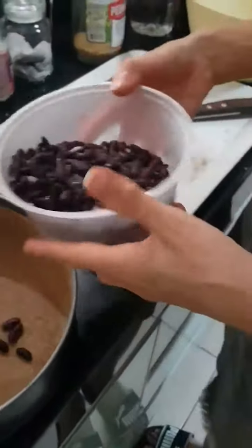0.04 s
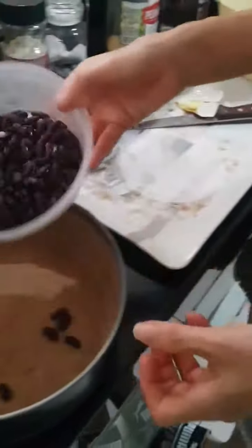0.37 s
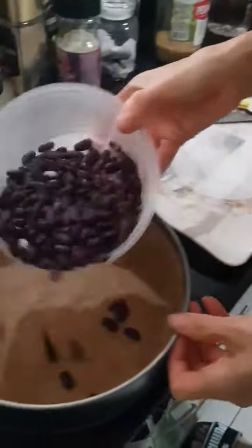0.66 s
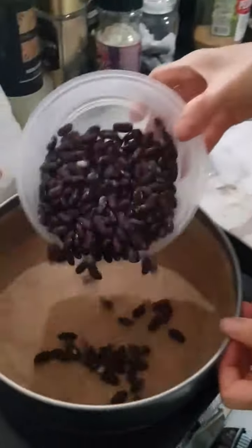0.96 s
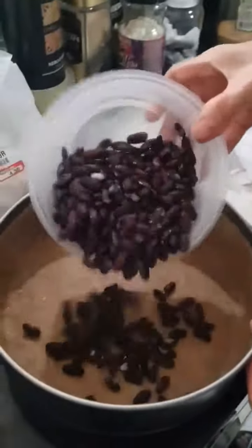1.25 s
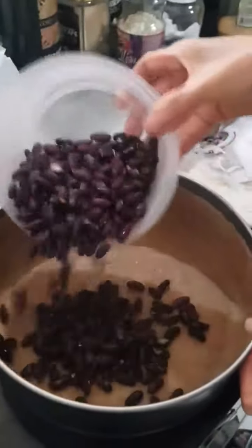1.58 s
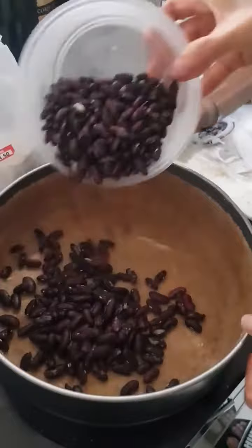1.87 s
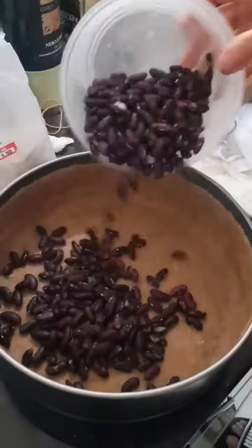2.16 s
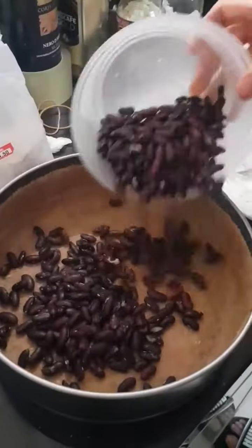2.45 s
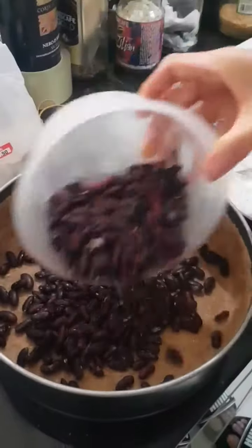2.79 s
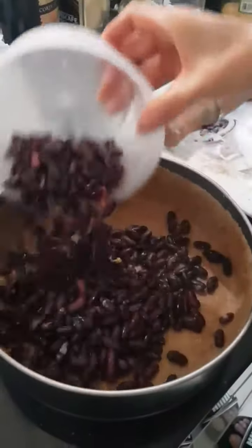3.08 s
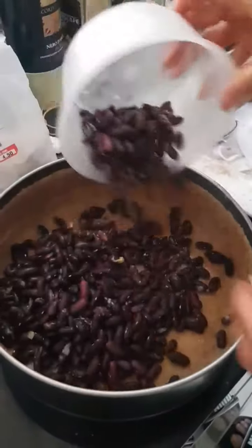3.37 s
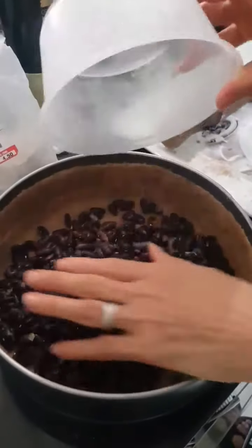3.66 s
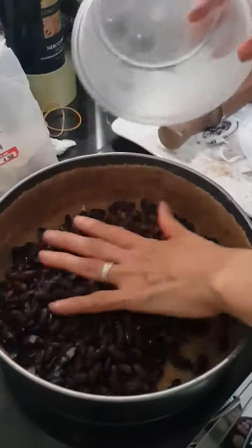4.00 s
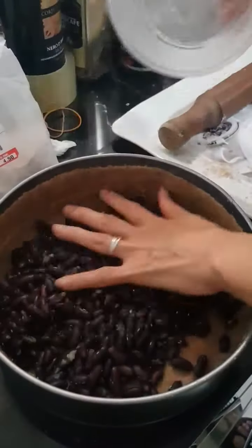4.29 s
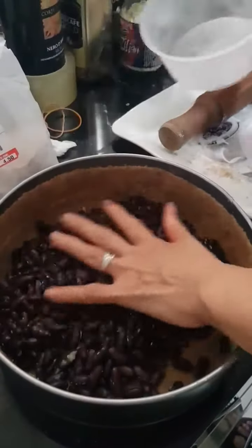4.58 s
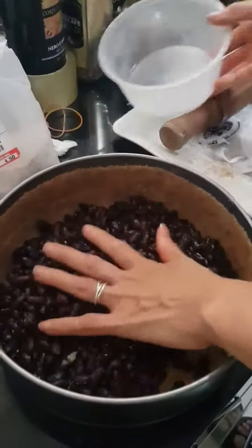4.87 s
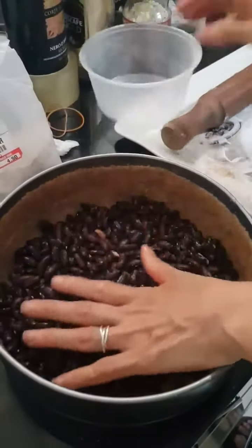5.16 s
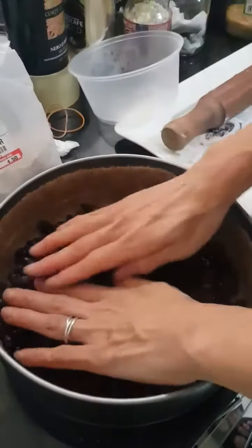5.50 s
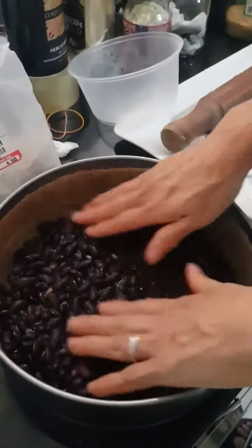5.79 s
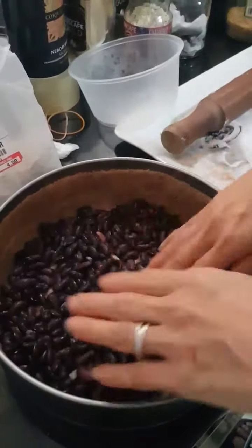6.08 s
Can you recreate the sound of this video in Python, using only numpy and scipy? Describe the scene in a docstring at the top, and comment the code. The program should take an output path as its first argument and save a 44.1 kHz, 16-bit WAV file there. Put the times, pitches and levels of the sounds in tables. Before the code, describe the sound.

From the start, dried beans slide and rattle along the wall of a thin plastic tub in short shakes. From about 0.7 seconds they land in a paper-lined metal baking tin with dull, hollow taps. The pour comes in quick uneven surges, growing denser from 1.2 seconds, with bright clicks of bean on bean. A last, strong rush comes around 3.6 seconds and dies away at once.

From about 4 to 5.2 seconds a hand spreads the heap in several quieter strokes, a soft grinding with small clicks. Between 5 and 5.4 seconds the empty tub is put down with a few briefly ringing knocks, the loudest near 5.15 seconds. Faint stirs of the beans follow until about 6.1 seconds. Everything sounds close, with the short echo of a small kitchen, over a low, steady appliance hum.

```python
"""Dried beans into a baking tin

In a small kitchen, beans are shaken from a plastic tub into a paper-lined metal tin. Each shake lets
go a little avalanche that rattles along the tub, clicks bean on bean and drums on the damped base.
Hands spread the heap, then the tub is put down beside the tin with a few ringing knocks.
An appliance hums throughout."""
import sys
import numpy as np
from scipy import signal
from scipy.io import wavfile
from scipy.ndimage import uniform_filter1d

SR = 44100
rng = np.random.default_rng(int(sys.argv[2]) if len(sys.argv) > 2 else 0)


def waveform_to_disk(signal):
    """Save audio, clipped to [-1, 1], as 16-bit WAV at the path in sys.argv[1]."""
    frames = np.transpose(np.atleast_2d(signal))
    scaled = np.clip(frames, -1, 1) * 32767
    samples = np.round(scaled).astype(np.int16)
    wavfile.write(sys.argv[1], SR, samples)


N = 275228
TIME = np.arange(N) / SR


def from_db(db):
    """Decibels to gain."""
    return 10 ** (np.asarray(db) / 20)


def rms(x):
    """Root mean square."""
    return np.sqrt(np.mean(x ** 2) + 1e-20)


def unit_energy(blow):
    """Scale a short sound to an average energy of 1 per ear."""
    return blow / (rms(blow) * np.sqrt(blow.shape[1]))


def at_hz(points, hz):
    """Read a curve on a log-frequency axis."""
    freqs, values = np.transpose(points)
    return np.interp(np.log(hz), np.log(freqs), values)


def add(out, s, sound):
    """Mix a short stereo sound in at s seconds."""
    start = round(s * SR)
    out[:, start:start + sound.shape[1]] += sound[:, :N - start]


def coloured(spectrum, envelope):
    """Stereo noise under an envelope, rung through third-octave bands, each with its own width and pan."""
    # how alike the ears are, held within +-0.97 below: (frequency [Hz], likeness [ratio])
    likeness = [(240, 2.8), (300, 0.4), (750, 0.9), (1200, 0.1), (2200, 0.61), (5000, 0), (15000, 0)]
    # pan across the spectrum: (frequency [Hz], left minus right [dB])
    balance = [(150, 0), (500, 1), (1200, 2), (2100, -4), (3300, -3.5), (5000, 2), (14000, 1.5)]
    white = rng.standard_normal((2, 2, len(envelope))) * envelope + 1e-18
    edges = 20 * 2 ** (np.arange(31) / 3)
    out, ears = 0, np.array([[1], [-1]])
    for k, (low, high) in enumerate(zip(edges, edges[1:])):
        hz = np.sqrt(low * high)
        if hz < spectrum[0][0] / 2:
            continue
        band = signal.butter(2, [low, high], "band", fs=SR, output="sos")
        mid, side = signal.sosfilt(band, white[k % 2])
        alike = np.clip(at_hz(likeness, hz), -.97, .97)
        gain = from_db(at_hz(spectrum, hz) + ears * at_hz(balance, hz) / 2)
        out = out + gain * (np.sqrt(1 + alike) * mid + np.sqrt(1 - alike) * side * ears)
    return out


def contacts(spectrum, t60, rise_s, count=32, size=2048):
    """Blows on different spots of one body: noise bursts stand for its dense, fast-dying modes."""
    envelope = (1 - np.exp(-TIME[:size] / rise_s)) * from_db(-60 * TIME[:size] / t60)
    bursts = coloured(spectrum, np.tile(envelope, count))
    return [unit_energy(blow) for blow in np.split(bursts, count, axis=1)]


def pitched(blow, hz, q, boost_db):
    """The struck spot favours one short resonance."""
    peak = signal.lfilter(*signal.iirpeak(hz, q, fs=SR), blow)
    return unit_energy(blow + from_db(boost_db) * peak)


def ring(modes, size, treble_hz=1100):
    """Struck modes, a little to the left; the higher a mode, the more its phase differs between ears."""
    t = TIME[:size]
    hz, mode_db, t60 = np.transpose(modes)[:, :, None]
    phase = rng.uniform(0, 2 * np.pi, hz.shape) + rng.standard_normal((2, *hz.shape)) * hz / treble_hz / 2
    sines = from_db(mode_db - 60 * t / t60) * np.sin(2 * np.pi * hz * t + phase)
    attack = 1 - np.exp(-t / 0.00037)
    return sines.sum(1) * attack * from_db([[1.5], [-1.5]])


def rattle(blows, level_db, per_s, spread_db, clump_db, clump_hz):
    """Random collisions of uneven size, swelling in clumps; the loudest flow has per_s a second."""
    knots = rng.standard_normal(4000)
    clumps = np.interp(TIME * clump_hz, np.arange(len(knots)), knots)
    rate = per_s * from_db((level_db - level_db.max()) / 2)
    strength = from_db(spread_db * np.clip(rng.standard_normal(N), -2, 2)) * rng.choice([-1, 1], N)
    clicks = (rng.random(N) < rate / SR) * strength * from_db(clump_db * clumps)
    # the flow sets the energy that the collisions share in each twentieth of a second
    local_rms = np.sqrt(np.abs(uniform_filter1d(clicks ** 2, SR // 20)) + 1e-6)
    clicks = clicks / local_rms * from_db(level_db)
    out, spot = np.zeros((2, N)), rng.integers(0, len(blows), N)
    for i in np.flatnonzero(clicks):
        add(out, i / SR, clicks[i] * blows[spot[i]])
    return out


def hits(blows, rows, gain_db, q, boost_db, bounce_s, bounce_db):
    """Accents: a bean strikes hard with its own pitch, then tips over and touches again more softly."""
    out = np.zeros((2, N))
    for k, ((s, db, hz), wait) in enumerate(zip(rows, rng.uniform(.5, 1.5, len(rows)))):
        add(out, s, from_db(db + gain_db) * pitched(blows[k % len(blows)], hz, q, boost_db))
        add(out, s + wait * bounce_s, from_db(db + gain_db + bounce_db) * blows[(k + 1) % len(blows)])
    return out


def appliance():
    """The bed of the scene: low air noise and mains hum."""
    # colour of the air noise: (frequency [Hz], level [dB])
    air_colour = [(20, -13), (33, -10), (50, -2), (66, 1), (85, -11), (125, -4), (175, -3), (260, -8),
                  (420, -14.5), (1000, -17), (3000, -27.5), (8000, -33.5), (15000, -33)]
    # slow rise and fall of the whole drone: (time [s], level [dB])
    level_curve = [(0, -47), (1.3, -47), (1.7, -44), (3.2, -45), (5.05, -46.5), (5.3, -50.5), (6.24, -51.5)]
    # mains tones: (frequency [Hz], level against the air noise [dB])
    mains = [(100.1, -5.5), (200.2, -10.5)]
    air = coloured(air_colour, np.ones(N))
    hum = sum(from_db(db) * np.sqrt(2) * np.sin(2 * np.pi * (hz * TIME + rng.random())) for hz, db in mains)
    level_db = np.interp(TIME, *np.transpose(level_curve))
    return from_db(level_db) * (air / rms(air) + hum)


def pour(on_wall=False, on_base=False):
    """Envelope in dB of the pour, bean on bean by default: each avalanche swells, runs and settles."""
    # one avalanche per tip or shake of the tub:
    # (time [s], length [s], bean-on-bean level [dB], tub wall offset [dB], tin base offset [dB])
    avalanches = [(-0.02, 0.1, -51.5, 6, -8), (0.209, 0.027, -59, 12.5, -4.5),
                  (0.314, 0.11, -44.5, 7.5, -10.5), (0.49, 0.057, -47, 8, -1), (0.589, 0.034, -50, 9, -0.5),
                  (0.68, 0.13, -51, 9.5, 7), (0.847, 0.066, -46, 3, 6), (0.954, 0.033, -47.5, 3, 3.5),
                  (1.047, 0.13, -50, 8.5, 10), (1.18, .10, -42, 1.5, 4), (1.343, 0.15, -39.5, 1, -2),
                  (1.508, 0.12, -40.5, 4, -1.5), (1.658, .17, -45, 5.5, 3), (1.966, 0.089, -51, 7, 8.5),
                  (2.174, 0.11, -46.5, 6.5, 5), (2.33, 0.12, -47, 8, 6), (2.405, .11, -40.5, 2.5, 3.5),
                  (2.602, 0.088, -49, 4, 3), (2.742, .04, -45, -5, 1), (2.844, 0.11, -43.5, 6, 0),
                  (2.937, .15, -39.5, 4, -3), (3.098, 0.18, -42, -0.5, -1), (3.332, 0.046, -42.5, 2, 6.5),
                  (3.416, 0.1, -40.5, -1, -3.5), (3.57, 0.078, -34.5, -7.5, -2),
                  (3.71, 0.027, -59, -13, 9.5)]
    attack_s, settle_db_per_s = 0.029, 132.5
    power = 1e-12
    for s, length, db, wall_db, base_db in avalanches:
        swell = np.clip((TIME - s) / attack_s, 0, 1)
        settle_db = settle_db_per_s * np.clip(TIME - s - length, 0, 1)
        power = power + (swell * from_db(db + on_wall * wall_db + on_base * base_db - settle_db)) ** 2
    return 10 * np.log10(power)


def tub_rattle():
    """Beans tumble along the thin plastic wall, each with a short woody note."""
    # colour of one tap on the wall: (frequency [Hz], level [dB])
    wall_colour = [(300, -10), (600, -7.5), (1100, 0), (1500, -8.5), (2000, -4), (2450, 1.5), (3300, -6),
                   (4500, -6.5), (7000, -16), (15000, -27)]
    # the hardest slaps on the wall: (time [s], relative level [dB], pitch [Hz])
    slaps = [(0.382, -28, 2340), (0.3964, -20.5, 2400), (0.4183, -16, 2450), (0.611, -28, 3040),
             (0.7825, -28.5, 2680), (1.2238, -25.5, 2880), (1.5176, -20, 2020), (1.5394, -21.5, 2700),
             (1.6975, -20, 2340), (2.1301, -25.5, 2270), (2.4242, -24, 2740), (2.459, -19.5, 2500),
             (2.5213, -25, 2930), (2.607, -29.5, 2560), (2.6558, -23.5, 2020), (2.8474, -17, 3100),
             (2.9558, -26, 2440), (3.0769, -20, 2560), (3.3179, -19.5, 2060)]
    taps = contacts(wall_colour, t60=0.017, rise_s=0.00082, size=1024)
    pitches = np.geomspace(1000, 4000, len(taps))
    blows = [pitched(tap, hz, q=12.6, boost_db=12) for tap, hz in zip(taps, pitches)]
    stream = rattle(blows, pour(on_wall=True) + 2.66, per_s=900, spread_db=2.5, clump_db=1.5, clump_hz=87.2)
    return stream + hits(taps, slaps, gain_db=19.5, q=10, boost_db=8.5, bounce_s=.003, bounce_db=-8.5)


def bean_clicks():
    """Hard skins click together, in the stream and then under the hands; small beans click higher."""
    # colour of one bean striking another: (frequency [Hz], level [dB])
    skin_colour = [(500, -11), (1500, -9.5), (3000, -1), (5000, -1), (7000, -4), (9500, -1), (12000, 1),
                   (15500, -5.5)]
    # the sharpest clicks: (time [s], relative level [dB], pitch [Hz])
    ticks = [(0.8794, -37.5, 10200), (1.058, -29.5, 8400), (1.394, -32, 9100), (1.5544, -21.5, 13500),
             (1.9322, -36.5, 10500), (2.0432, -32.5, 15000), (2.1347, -31, 11200), (2.2278, -33, 11800),
             (2.2754, -33, 12100), (2.382, -33, 12000), (2.4074, -30, 11000), (2.6397, -28, 14500),
             (2.6533, -32, 11500), (2.721, -27, 13300), (2.7537, -30, 11100), (3.362, -30.5, 13500),
             (3.748, -40, 8900), (4.3, -43, 12600), (4.6994, -43, 7500)]
    taps = contacts(skin_colour, t60=0.016, rise_s=0.00037, count=48, size=512)
    pitches = np.linspace(3000, 15000, len(taps))
    blows = [pitched(tap, hz, q=13, boost_db=10) for tap, hz in zip(taps, pitches)]
    level_db = np.maximum(pour(), spreading()) + 2.5
    stream = rattle(blows, level_db, per_s=2200, spread_db=2, clump_db=1, clump_hz=109.5)
    return stream + hits(taps, ticks, gain_db=21.5, q=16, boost_db=16, bounce_s=0.0033, bounce_db=-4.5)


def tin_drumming():
    """Beans drum on the base: a dull tap and a hollow note that the paper and the heap keep short."""
    # colour of one tap on the base: (frequency [Hz], level [dB])
    base_colour = [(150, -19), (330, -4), (570, -5), (750, 7.5), (1000, -2), (1250, 3), (1600, -4.5),
                   (3000, -14.5), (6000, -29)]
    # hollow note of the damped base: (frequency [Hz], level [dB], t60 [s])
    base_modes = [(449, -13, 0.097), (702, -13, 0.083), (724, 1, 0.048), (781, 0.5, 0.047), (863, 2, 0.033),
                  (1064, -8, 0.012), (1190, -7.5, 0.049), (1335, -9, 0.026)]
    # the hardest landings: (time [s], relative level [dB], pitch [Hz])
    landings = [(0.721, -30, 725), (0.875, -25, 790), (0.886, -23.5, 780), (1.024, -31.5, 713),
                (1.054, -24, 760), (1.078, -28.5, 783), (1.218, -28, 720), (1.246, -28, 770),
                (1.629, -29, 685), (1.907, -26.5, 791), (1.933, -25.5, 780), (2.008, -24.5, 880),
                (2.148, -26, 816), (2.333, -25, 700), (2.375, -25.5, 690), (2.494, -24.5, 760),
                (2.723, -27.5, 794), (3.255, -29.5, 710), (3.563, -29.5, 732), (3.602, -22.5, 694),
                (3.631, -25, 910), (4.61, -37, 711), (4.73, -38.5, 837)]
    taps = contacts(base_colour, t60=0.016, rise_s=0.00059)
    notes = [unit_energy(ring(base_modes, size=2048)) for _ in taps]
    blows = [unit_energy(note + from_db(-0.5) * tap) for note, tap in zip(notes, taps)]
    stream = rattle(blows, pour(on_base=True) + 0.85, per_s=450, spread_db=5, clump_db=4, clump_hz=69.4)
    return stream + hits(blows, landings, gain_db=21.5, q=6.8, boost_db=-4, bounce_s=.0091, bounce_db=-7.5)


def spreading():
    """Envelope in dB of the stirred heap: each stroke swells and fades like a bell curve."""
    # strokes of a hand through the heap: (centre time [s], length [s], level [dB])
    strokes = [(4.003, 0.083, -48.5), (4.142, 0.082, -53), (4.267, 0.17, -53.5), (4.474, 0.11, -52),
               (4.63, 0.083, -50.5), (4.744, 0.086, -48), (4.868, 0.056, -53), (5.058, .14, -53),
               (5.70, 0.044, -62.5), (5.837, 0.036, -58), (6.07, 0.061, -60)]
    resting_db, hand_on_s = -82, 3.8   # the palm stirs the heap a little between strokes
    power = from_db(resting_db) ** 2 * (TIME > hand_on_s) + 1e-14
    for s, length, db in strokes:
        bell = np.exp(-np.minimum((2 * (TIME - s) / length) ** 2, 20))
        power = power + from_db(db) ** 2 * bell
    return 10 * np.log10(power)


def palm_rub():
    """Pressed by a palm, the heap grinds softly over the base."""
    # colour of one contact under the palm: (frequency [Hz], level [dB])
    heap_colour = [(200, -11), (400, -8), (600, -9), (780, 4), (1000, -1), (1500, -9.5), (2800, -8),
                   (5000, -23), (10000, -15)]
    blows = contacts(heap_colour, t60=0.027, rise_s=0.0012, count=16)
    # the rub follows only part of the swing, so light strokes are mostly rub and firm ones click more
    firm_stroke_db, firm_rub_db, follow = -51, -46.5, 0.72
    level_db = firm_rub_db + follow * (spreading() - firm_stroke_db)
    return rattle(blows, level_db, per_s=300, spread_db=2.5, clump_db=1.5, clump_hz=51)


def tub_knocks():
    """The tub is put down: each knock, a clack of its own strength and brightness, rings the same modes."""
    # the knocks: (time [s], relative clack level [dB], relative ring level [dB], clack cut-off [Hz])
    knocks = [(5.034, -31.5, -53, 4000), (5.049, -21, -20.5, 3060), (5.088, -34, -43, 1300),
              (5.1499, -11, -19, 7900), (5.160, -12, -32, 3500), (5.329, -28, -53, 5100),
              (5.3357, -18.5, -20, 4300), (5.372, -25.5, -27.5, 3100), (5.399, -30.5, -53, 4100)]
    # colour of the clack: (frequency [Hz], level [dB])
    clack_colour = [(140, -18), (200, -9), (280, -9), (500, -4.5), (700, 0.5), (1000, 2), (1400, -0.5),
                    (1900, -0.5), (2600, -5.5), (3800, -6.5), (5500, -13.5), (11000, -10), (15500, -6.5)]
    # the ring after each knock: (frequency [Hz], level [dB], t60 [s])
    knock_modes = [(175, -14, 0.17), (204.6, -12, 0.18), (482.5, -9, 0.26), (543, -13.5, 0.33),
                   (773, -9, 0.21), (933, -2, 0.3), (1000, 1.5, 0.21), (1014, 1, 0.16), (1150, -24, .35),
                   (1352, -13, 0.25), (1626, -18, 0.2), (2040, -21, 0.19), (2310, -17, 0.2),
                   (2660, -28, 0.21), (2820, -34, 0.22), (3070, -20, 0.18), (3720, -33, 0.19),
                   (3720, -17, 0.18), (4200, -15.5, 0.18)]
    clacks = contacts(clack_colour, t60=0.077, rise_s=0.0006, count=len(knocks), size=4096)
    note = ring(knock_modes, size=SR // 2, treble_hz=1800)
    out = np.zeros((2, N))
    for (s, clack_db, ring_db, cut_hz), clack in zip(knocks, clacks):
        low_pass = signal.butter(2, cut_hz, fs=SR, output="sos")
        add(out, s, from_db(clack_db + 28) * signal.sosfilt(low_pass, clack))
        add(out, s, from_db(ring_db - 1) * note)
    return out


def off_centre(x, lag_s):
    """The sound reaches the right ear a little later."""
    return np.array([x[0], np.interp(TIME - round(lag_s * SR) / SR, TIME, x[1])])


def kitchen(x, wet_db, t60, treble_t60, split_hz=5000):
    """Add diffuse echoes from counter and walls; the treble dies sooner."""
    t, white = TIME[:SR], rng.standard_normal((2, SR))
    low = signal.sosfilt(signal.butter(1, split_hz, fs=SR, output="sos"), white)
    tail = low * from_db(-60 * t / t60) + (white - low) * from_db(-60 * t / treble_t60)
    build_up = 1 - np.exp(-t / 0.0016)
    echoes = signal.oaconvolve(x, unit_energy(tail * build_up), axes=1)[:, :N]
    return x + from_db(wet_db) * echoes


def scene():
    """Beans with a tight room tail and knocks with a longer one, over the appliance's drone."""
    grains = off_centre(tin_drumming() + tub_rattle() + bean_clicks() + palm_rub(), lag_s=.00012)
    knocks = off_centre(tub_knocks(), lag_s=.00029)
    grains = kitchen(grains, wet_db=-7, t60=0.17, treble_t60=0.16)
    knocks = kitchen(knocks, wet_db=-8.5, t60=0.59, treble_t60=0.46)
    return grains + knocks + appliance()


def record(dry):
    """Soft saturation rounds the loudest peaks, and the top is cut steeply at 15.5 kHz."""
    high_cut = signal.ellip(10, .2, 80, 15500, fs=SR, output="sos")
    return signal.sosfilt(high_cut, np.tanh(dry))


dry = scene()
out = record(dry)
waveform_to_disk(out)
```